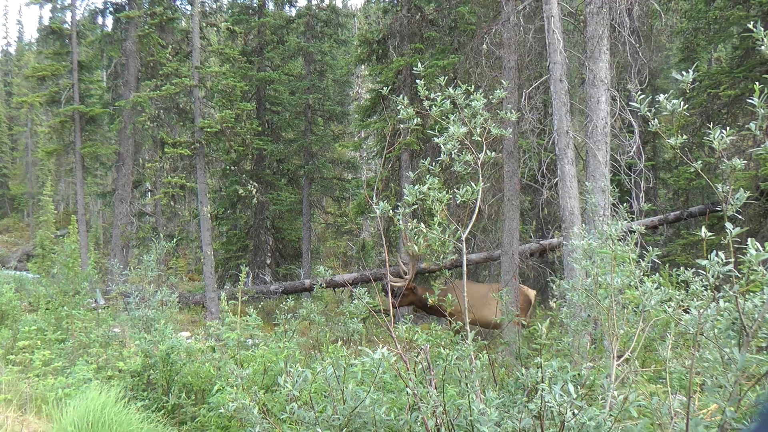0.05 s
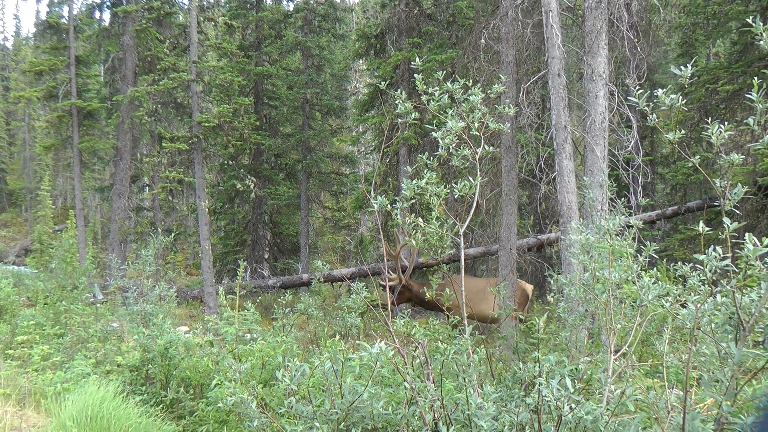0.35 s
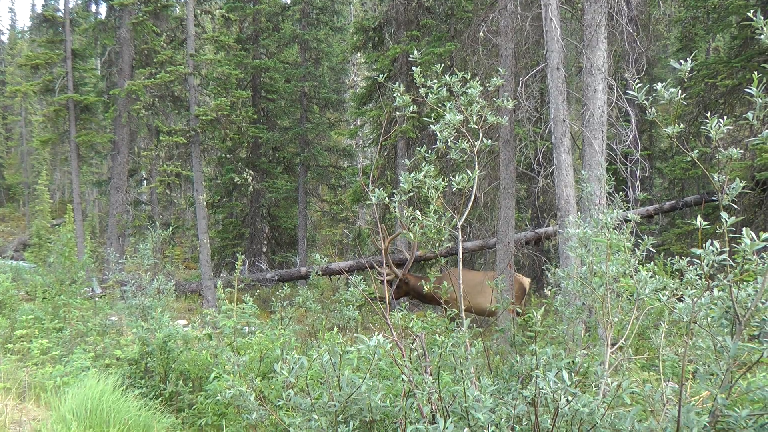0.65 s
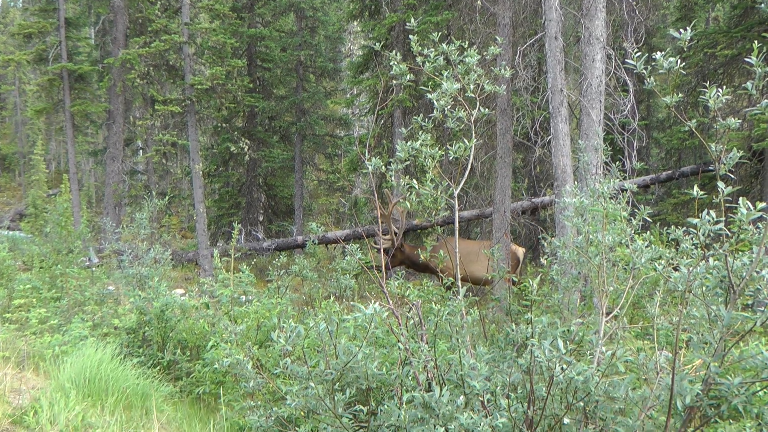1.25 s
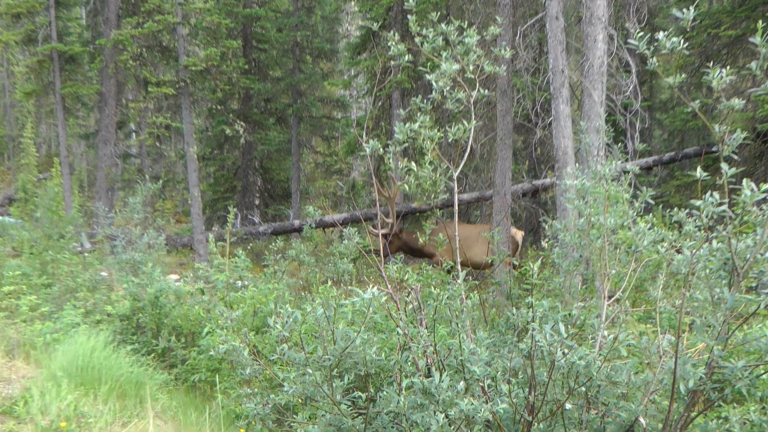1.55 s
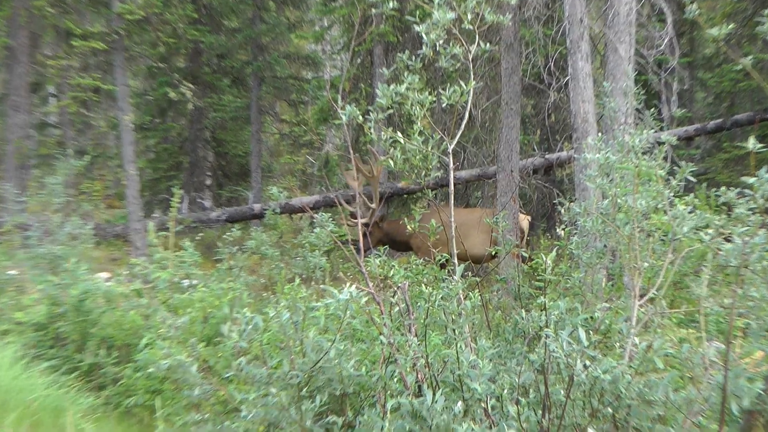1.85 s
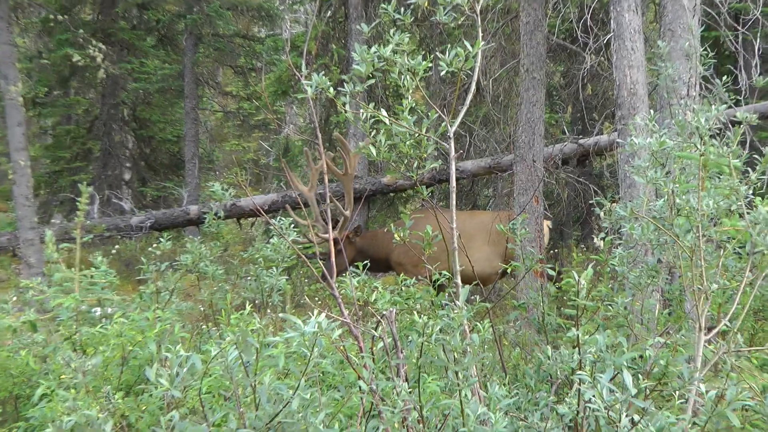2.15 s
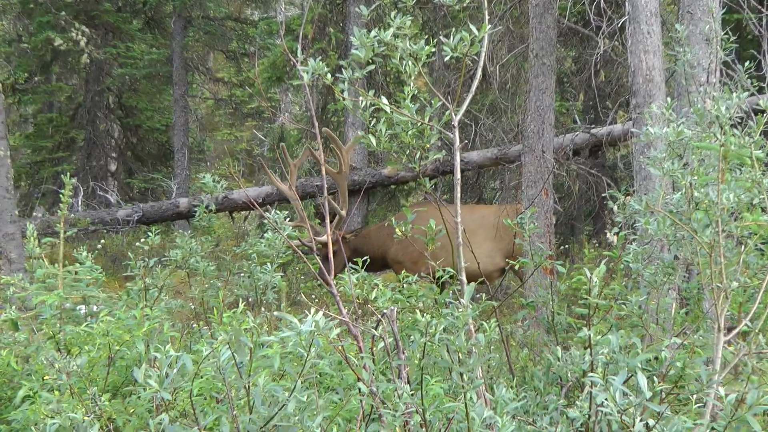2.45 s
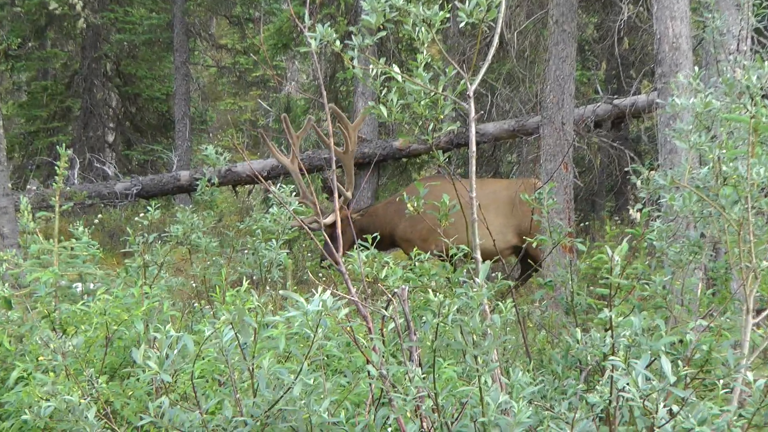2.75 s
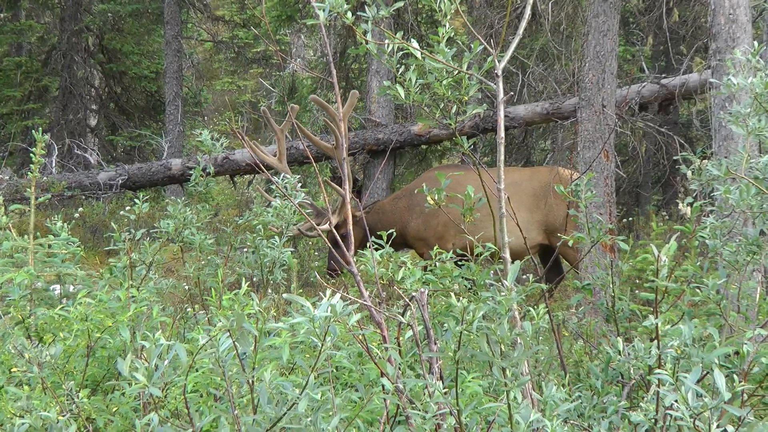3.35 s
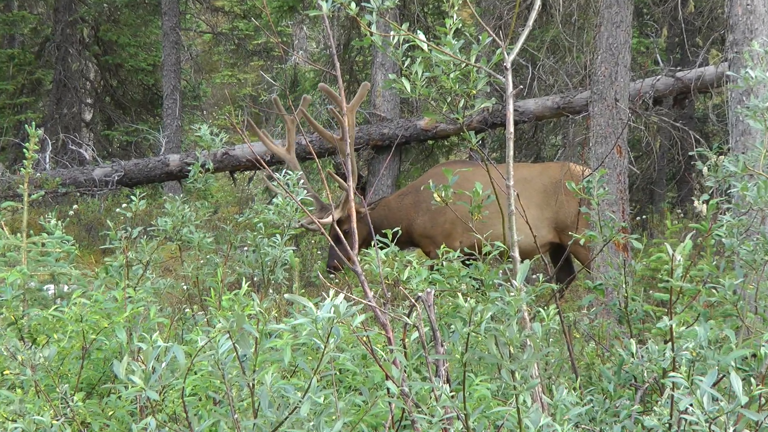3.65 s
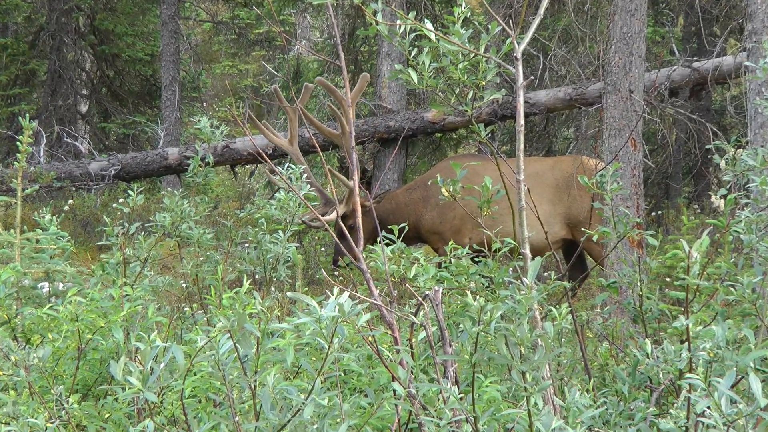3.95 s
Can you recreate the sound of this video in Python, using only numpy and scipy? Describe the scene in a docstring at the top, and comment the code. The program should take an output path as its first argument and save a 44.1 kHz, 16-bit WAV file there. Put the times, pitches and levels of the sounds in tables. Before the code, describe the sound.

Soft, even rushing like far water or wind fills a forest edge, leaves barely rustling.

```python
"""A steady rush of distant water or wind in the trees fills a forest edge.
It is broadband noise, partly coherent between left and right, whose level and treble drift gently.
Nearby, leaves and twigs tick as they flick (damped noise bursts) and rustle a few times as they brush
(friction in many tiny slips). Underneath, a faint deep hum, one wavering tone, fades and swells again."""
import sys
import numpy as np
from scipy import signal
from scipy.fft import rfft, irfft
from scipy.io import wavfile
from scipy.ndimage import uniform_filter1d

SR = 44100
rng = np.random.default_rng(int(sys.argv[2]) if len(sys.argv) > 2 else 0)


def dump_mix(stems):
    """Bounce the given channels to the path in sys.argv[1] as a 16-bit WAV at rate SR."""
    frames = np.atleast_2d(stems).T  # one column per channel
    limited = np.clip(frames, -1, 1)  # hard clip at full scale
    pcm = np.round(limited * 32767).astype(np.int16)
    wavfile.write(sys.argv[1], SR, pcm)


N = 176400

# Spectral density of the rush (frequency [Hz], relative level [dB])
RUSH_SPECTRUM = [(15, -28), (30, -16.0), (45, -11.5), (65, -9.5), (110, -0.8), (150, 0.1), (215, -1),
                 (260, -2.5), (380, -2.5), (470, -1.0), (590, 0.5), (760, -2), (1050, -1.2), (1400, -3.5),
                 (2000, -6.5), (2800, -8.5), (4000, -13), (5500, -15), (7400, -20.5), (8700, -25),
                 (10400, -29), (13000, -38), (16200, -44.5)]
# Slow drift of the whole rush (time [s], relative level [dB])
RUSH_DRIFT = [(0.05, -1), (0.45, 0), (0.9, -1), (1.5, 0), (2.0, -0.34), (2.5, 0.05), (3.0, -0.7),
              (3.5, 0.3), (4.0, -0.3)]
# Treble shelf of the rush (time [s], gain at the shelf's midpoint [dB])
TREBLE_SHELF = [(0.05, -0.5), (0.35, -1), (0.6, -0.3), (0.85, 0.7), (1.6, 0), (2.0, 0.5), (2.6, -0.5),
                (2.95, 1.0), (3.25, 0.5), (4.0, -0.2)]
# Likeness of the rush in left and right (frequency [Hz], coherence [0-1])
STEREO_COHERENCE = [(60, 0.91), (160, 1), (270, 0.88), (450, 0.78), (740, 0.75), (1220, .76), (2010, 0.79),
                    (3330, .88), (5500, 0.94), (8500, 0.93), (10500, 1)]
# Balance of the rush (frequency [Hz], left minus right level [dB])
STEREO_BALANCE = [(60, .5), (220, 0.2), (340, .5), (550, -1.5), (800, 0.5), (1290, 0.9), (2380, 1.5),
                  (4400, .5), (8000, 0.4), (15000, 1.2)]
# Phase of the rush between the channels (frequency [Hz], lead of the left [rad])
PHASE_LEAD = [(0, 0), (340, 0.17), (600, 0.11), (1640, 0.0025), (2840, -0.0), (15900, 0.0)]
# Flicks of leaves and twigs (time [s], level [dB], centre [Hz], width [octaves], decay time [s])
LEAF_TICKS = [(0.974, -41, 6500, 0.92, .002), (0.9797, -31, 5540, 0.74, 0.0023),
              (0.9855, -34, 1900, 1, .005), (0.991, -47, 8000, .8, 0.0036),
              (1.4250, -24, 1980, .55, 0.0013), (1.4293, -30, 1700, 0.84, 0.0033),
              (1.4275, -48, 10500, .15, .003), (1.441, -53, 14500, .2, .002), (2.416, -52, 14000, .4, .005),
              (2.744, -40, 6760, 0.31, 0.0037), (3.681, -40.5, 6000, 1.0, .0025),
              (3.701, -29.5, 2320, .22, 0.0049), (3.7085, -44, 8500, .9, .005)]
# Leaves brushing (time [s], duration [s], level [dB], centre [Hz], width [octaves])
LEAF_RUSTLES = [(0.963, 0.049, -44, 3800, 0.75), (3.667, 0.066, -40.5, 2090, 1.24)]
# Course of the deep hum (time [s], frequency [Hz], relative level [dB])
HUM_COURSE = [(0.08, 28.5, -56), (1.64, 29.0, -66), (1.98, 28.2, -72), (2.48, 28.9, -72), (2.61, 30.3, -69),
              (2.94, 29.8, -61), (3.34, 32.8, -54), (3.64, 34.3, -52), (4.0, 33.8, -53)]


def distant_rush(level_db=-34.5, patch_db=0.43, swell_db=0.37, flicker_db=0.26, shelf_mid_hz=5000):
    """Superposition: countless incoherent sources in water or wind sum to broadband Gaussian noise."""
    size, hop = 1024, 256
    frames, hz = N // hop + 5, np.fft.rfftfreq(size, 1 / SR)
    t = np.arange(frames) * hop / SR
    shape = (2, frames, len(hz))
    left, independent = rng.standard_normal(shape) + 1j * rng.standard_normal(shape)
    coherence = over_hz(STEREO_COHERENCE, hz)  # lowest, so most diffuse, in the midrange
    right = coherence * left + np.sqrt(1 - coherence ** 2) * independent
    right *= np.exp(-1j * over_hz(PHASE_LEAD, hz))
    balance = amp(over_hz(STEREO_BALANCE, hz) / 2)
    # Soft patches of level drift over time and frequency.
    patches = unit(uniform_filter1d(wander((frames, len(hz)), size=10), size=9, axis=1))
    drift_db = over_time(RUSH_DRIFT, t) + swell_db * wander(frames, size=40)
    drift_db += flicker_db * wander(frames, size=3)
    treble_db = over_time(TREBLE_SHELF, t)[:, None] * 2 * hz / (hz + shelf_mid_hz)
    gain = amp(over_hz(RUSH_SPECTRUM, hz) + patch_db * patches + drift_db[:, None] + treble_db)
    spectra = np.array([left * balance, right / balance]) * gain
    _, noise = signal.istft(spectra.swapaxes(1, 2), nperseg=size, noverlap=size - hop)
    return amp(level_db) * unit(noise[:, :N])


def leaf_tick(level_db, centre_hz, octaves, decay_s, rise_s=0.00049, size=2048):
    """Damped vibration: a flicked leaf or twig gives a noise burst that decays exponentially."""
    t = np.arange(size) / SR
    envelope = np.minimum(t / rise_s, 1) * np.exp(-np.maximum(t - rise_s, 0) / decay_s)
    burst = envelope * leaf_resonance(rng.standard_normal((2, size)), centre_hz, octaves)
    return amp(level_db) * np.sqrt(np.mean(envelope ** 2)) * unit(burst)


def leaf_rustle(length_s, level_db, centre_hz, octaves, slips_per_s=4200, spread_db=2.3, size=8192):
    """Stick-slip friction: brushing leaves give dense random impulses under one arch of level."""
    slipping = rng.random(size) < slips_per_s / SR
    strength = amp(spread_db * np.minimum(rng.exponential(1, size), 4))
    drive = slipping * strength * rng.standard_normal((2, size))
    arch = np.sin(np.pi * np.minimum(np.arange(size) / SR / length_s, 1))
    return amp(level_db) * arch * leaf_resonance(drive, centre_hz, octaves)


def leaf_resonance(drive, centre_hz, octaves, stereo_spread=0.32):
    """Resonance: a leaf favours one broad band of a mid and side drive, heard as left and right."""
    hz = np.fft.rfftfreq(drive.shape[1], 1 / SR) + 1
    response = np.exp(-0.5 * (np.log2(hz / centre_hz) / octaves) ** 2)
    mid, side = irfft(rfft(drive) * response)
    return unit(np.array([mid + stereo_spread * side, mid - stereo_spread * side]))


def foliage(strays_per_s=6):
    """Transients add linearly: clear ticks and rustles, with faint stray ticks at random times."""
    mix = np.zeros((2, N))
    for start_s, *tick in LEAF_TICKS:
        add(mix, start_s, leaf_tick(*tick))
    for start_s, *rustle in LEAF_RUSTLES:
        add(mix, start_s, leaf_rustle(*rustle))
    for when, pitch in rng.random((round(strays_per_s * N / SR), 2)):
        stray = leaf_tick(level_db=-51, centre_hz=5500 * 2 ** (pitch - 0.5), octaves=0.5, decay_s=0.0018)
        add(mix, when * N / SR, stray)
    return mix


def deep_hum(gain_db=-1.5, waver_fraction=0.018):
    """Frequency modulation: one low tone, perhaps a far engine, wavers about a gliding pitch."""
    t = np.arange(N) / SR
    hz = over_time(HUM_COURSE, t) * (1 + waver_fraction * wander(N, size=4000))
    cycles = np.cumsum(hz) / SR + rng.random()
    level_db = gain_db + over_time(HUM_COURSE, t, column=2)
    return amp(level_db) * unit(np.sin(2 * np.pi * cycles))


def amp(db):
    """Amplitude grows tenfold for every 20 dB."""
    return 10 ** (np.asarray(db) / 20)


def unit(x):
    """Normalisation to an rms of one."""
    return x / np.sqrt(np.mean(x ** 2) + 1e-20)


def over_hz(points, hz):
    """Interpolation of a table on a logarithmic frequency axis."""
    frequency, value = np.transpose(points)
    return np.interp(np.log(hz + 1), np.log(frequency + 1), value)


def over_time(points, t, column=1):
    """Linear interpolation of one column at the times t."""
    points = np.array(points)
    return np.interp(t, points[:, 0], points[:, column])


def wander(shape, size):
    """Two moving averages along the first axis turn white noise into smooth random motion."""
    smoothed = uniform_filter1d(rng.standard_normal(shape), size, axis=0)
    return unit(uniform_filter1d(smoothed, size, axis=0))


def add(mix, start_s, sound):
    """Superposition of a stereo sound on the mix, from start_s on."""
    part = mix[:, max(round(start_s * SR), 0):][:, :sound.shape[1]]
    part += sound[:, :part.shape[1]]


def scene():
    """Sound pressures add: the rush, the nearby foliage and the hum beneath."""
    return distant_rush() + foliage() + deep_hum()


def record(dry, start_s=0.046, fade_s=0.014, floor_db=-67, cutoff_hz=16450):
    """Gating and band limiting: the sound fades in after a moment and loses its highest treble."""
    opening = np.clip((np.arange(N) / SR - start_s) / fade_s, amp(floor_db), 1)
    low_pass = signal.firwin(1023, cutoff_hz, window=("kaiser", 9), fs=SR)
    return signal.oaconvolve(dry * opening, low_pass[None], "same", axes=1)


dry = scene()
out = record(dry)
dump_mix(out)
```